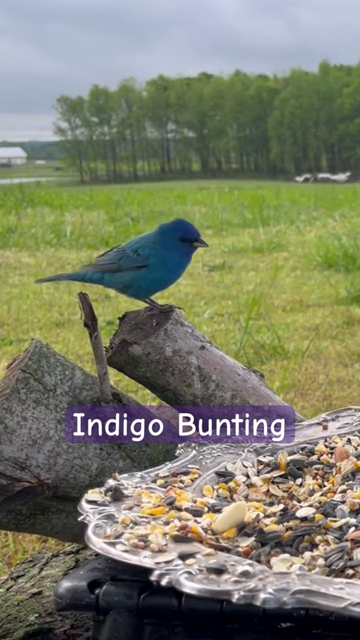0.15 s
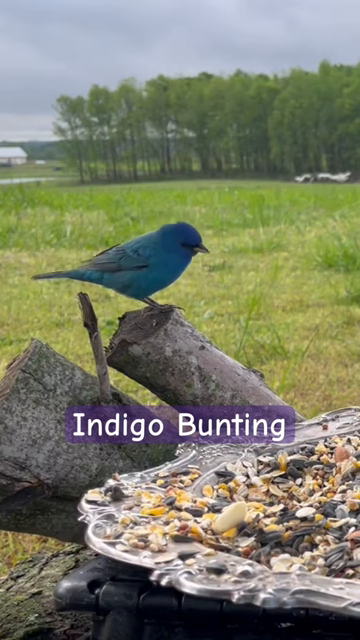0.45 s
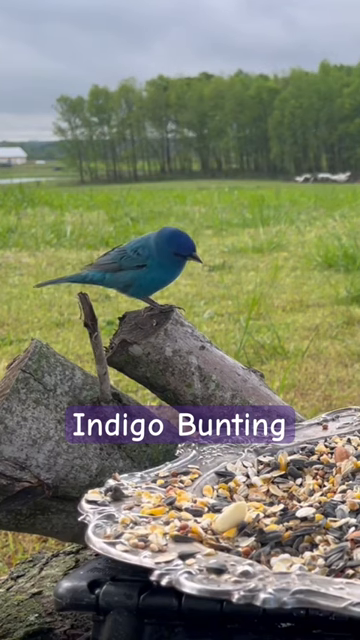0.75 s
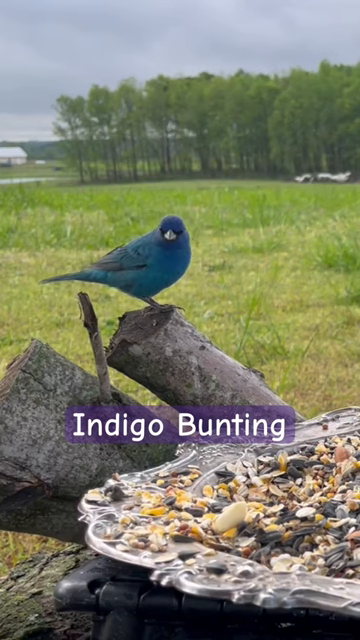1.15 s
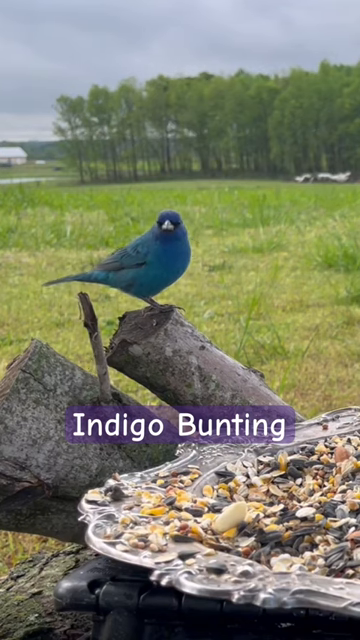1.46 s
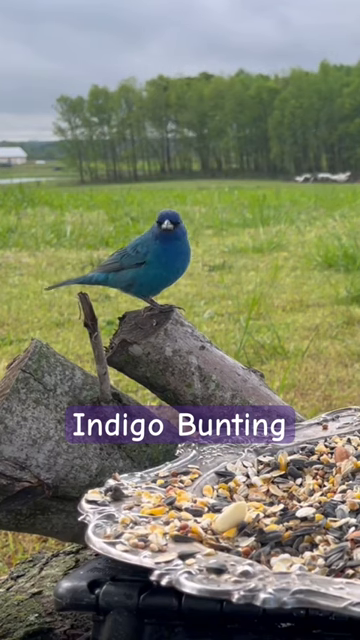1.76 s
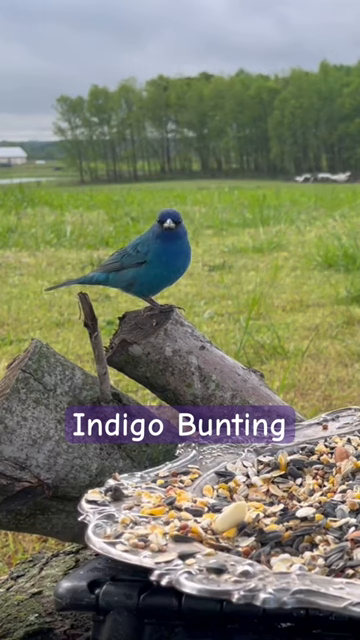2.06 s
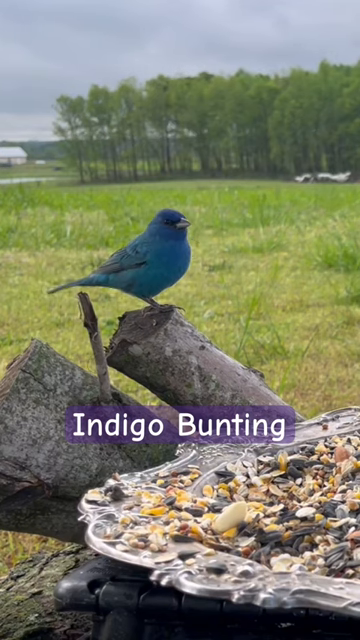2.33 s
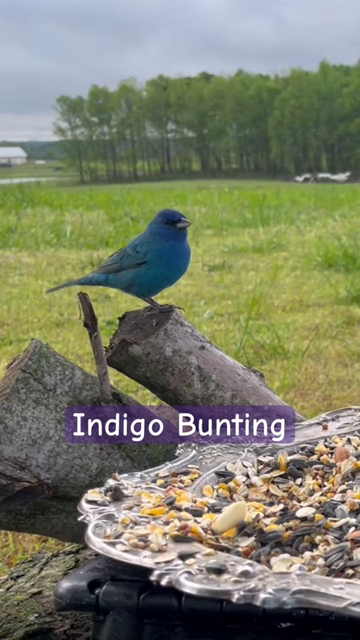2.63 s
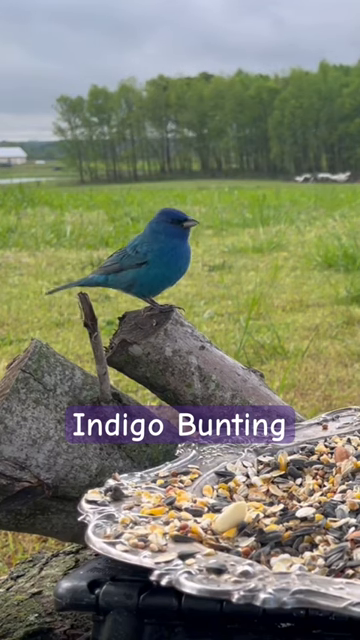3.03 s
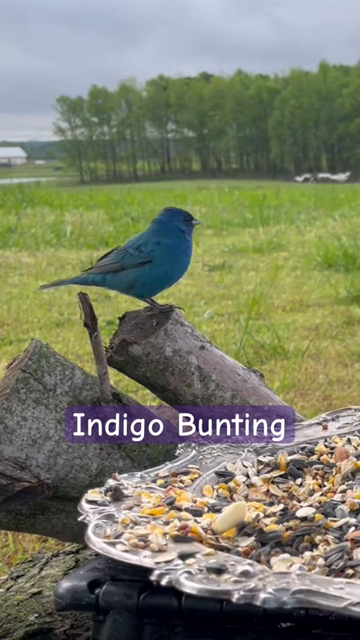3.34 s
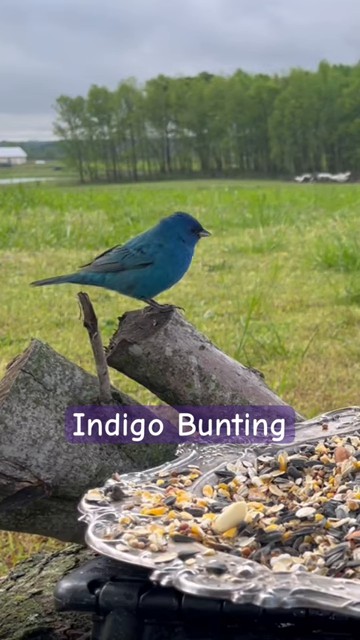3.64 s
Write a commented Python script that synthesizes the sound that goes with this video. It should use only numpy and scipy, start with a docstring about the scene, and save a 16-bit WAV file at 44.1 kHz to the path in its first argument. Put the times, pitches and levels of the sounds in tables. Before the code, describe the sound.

Gusty wind noise dominates, deep and unsteady, with brief bassy buffets. Behind it, distant birds chirp early, nearly fall silent midway, and whistle again near the end as a nearer bird buzzes raspily; outdoors, phone microphone.

```python
"""Wind on a phone's two microphone ports in a breezy garden: shaped noise rumbles, gliding thuds buffet the bass.
Late on, a closer bird to the left buzzes: fast rising pulses of tone with raspy overtones.
Far birds whistle, slur and pipe as gliding sines, and chip as sines roughened by noise; trees echo all birds.
Behind lie a far chorus, one blurred band of noise, and the diffuse air of leaves and far country."""
import sys
import numpy as np
from scipy import signal
from scipy.fft import rfft, irfft
from scipy.io import wavfile
from scipy.ndimage import uniform_filter1d

SR = 44100
rng = np.random.default_rng(int(sys.argv[2]) if len(sys.argv) > 2 else 0)


def put_to_file(sound):
    """Save the sound as 16-bit audio at rate SR, in the file named by the first command-line argument."""
    columns = np.atleast_2d(sound).T  # one column per channel
    safe = np.clip(columns, -1, 1)
    whole_steps = np.round(safe * 32767)
    wavfile.write(sys.argv[1], SR, whole_steps.astype(np.int16))


def magnitude_from_level(level_db):
    """Linear magnitude for a level in decibels (20 dB per decade)."""
    exponent = np.asarray(level_db, float) / 20
    return 10 ** exponent


N = 167139
T = np.arange(N) / SR  # s


def colour(x, points):
    """Shape the spectrum by (f/Hz, gain/dB) points, joined along log frequency."""
    p = np.array(points, float)
    hz = np.maximum(np.arange(N // 2 + 1) * SR / N, 1)
    gain_db = np.interp(np.log(hz), np.log(p[:, 0]), p[:, 1])
    return irfft(rfft(x) * magnitude_from_level(gain_db), N)


def curve(rows, col=1):
    """Straight lines between table rows."""
    return np.interp(T, np.array(rows)[:, 0], np.array(rows)[:, col])


def unit(x):
    """Rms 1."""
    return x / np.sqrt(np.mean(x ** 2))


def walk(rate):
    """Smooth random wander of rms 1: noise averaged twice over 1/rate seconds."""
    k = max(int(SR / rate), 1)
    smooth = uniform_filter1d(rng.standard_normal(N), k)
    return unit(uniform_filter1d(smooth, k))


# Side of the diffuse noise against its mid; above about 10 kHz the side thins steeply: f/Hz, side minus mid
# level/dB
SIDE_SPREAD = [(60, -8), (300, -5), (1300, 3.5), (2300, -6.5), (9000, 4.5), (10800, -14)]


def wide(points):
    """Diffuse noise at both ports, from independent mid and side; the mid has rms 1."""
    mid = colour(rng.standard_normal(N), points)
    side = colour(rng.standard_normal(N), points)
    gain = 1 / np.sqrt(np.mean(mid ** 2))
    side = colour(side, SIDE_SPREAD)
    return gain * np.array([mid + side, mid - side])


def place(x, pan_db, lag_s):
    """A source to the left of the microphones: louder and earlier there."""
    hz = np.arange(N // 2 + 1) * SR / N
    late = irfft(rfft(x) * np.exp(-2j * np.pi * hz * lag_s), N)
    return np.array([x * magnitude_from_level(pan_db / 2), late * magnitude_from_level(-pan_db / 2)])


def gate(start, length, edge):
    """Soft on, hold, soft off."""
    to_nearest_end = np.minimum(T - start, start + length - T)
    return np.clip(to_nearest_end / min(edge, length / 2), 0, 1) ** 2


def notes(rows, waver_db, bend, edge=.0089, swell_db=0):
    """Sines on glides that settle faster for a larger bend, wavering with distance."""
    out, blur, waver = 0, walk(300), walk(29)
    for start, length, from_hz, to_hz, db in rows:
        u = np.clip((T - start) / length, 0, 1)
        hz = to_hz + (from_hz - to_hz) * (1 - u) ** bend + 25 * blur
        tone = np.sin(2 * np.pi * np.cumsum(hz) / SR)
        swell = magnitude_from_level(db + swell_db * np.sin(np.pi * u))
        out = out + swell * gate(start, length, edge) * tone
    return np.sqrt(2) * out * magnitude_from_level(waver_db * waver)


# Wind on the ports, mid level before flutter: t/s, level/dB
WIND_GUSTS = [(0, -42.5), (.12, -40.5), (.3, -51), (.58, -43.5), (.72, -44), (1.03, -51), (1.3, -44),
              (1.52, -43), (1.82, -49), (1.93, -46.5), (2.2, -52), (2.6, -46), (3.1, -50), (3.2, -45),
              (3.5, -54.5), (3.73, -45.5)]
# Wind spectrum, relative: f/Hz, level/dB per Hz
WIND_SPECTRUM = [(20, -19), (45, -4), (70, -0.5), (130, -7.5), (280, -22.5), (500, -32.5), (900, -76)]
FLUTTER_DB, FLUTTER_PER_S = 3, 20.1
# Strong buffets: t/s, peak level/dB before roughening and filtering, length/s
WIND_BUFFETS = [(0.241, -27.5, 0.023), (.36, -38, .03), (1.622, -38.5, 0.014), (3.19, -40, .025),
                (3.594, -20, .05)]
# Each thud starts at the sum of these two pitches and drops towards the ring
BUFFET_RING_HZ, BUFFET_DROP_HZ, BUFFET_GLIDE_S = 58, 280, .0074


def wind():
    """Fluttering rumble; each buffet is a soft rough thud whose pitch drops to a low ring."""
    thuds = 0
    for start, db, length in WIND_BUFFETS:
        t = np.clip(T - start, 0, length)
        drop_cycles = BUFFET_DROP_HZ * BUFFET_GLIDE_S * (1 - np.exp(-t / BUFFET_GLIDE_S))
        phase = 2 * np.pi * (BUFFET_RING_HZ * t + drop_cycles)
        # .68 brings the peak forward, 1.5 softens both ends
        shape = np.abs(np.sin(np.pi * (t / length) ** .68)) ** 1.5
        thuds = thuds + magnitude_from_level(db) * shape * np.sin(phase)
    rough = thuds * (1 + .3 * walk(300))
    thuds = colour(rough, [(350, 0), (480, -30)])
    level_db = curve(WIND_GUSTS) + FLUTTER_DB * walk(FLUTTER_PER_S)
    return wide(WIND_SPECTRUM) * magnitude_from_level(level_db) + thuds


# Closer bird, mid-syllable level before pulsing and pan:
# t/s, length/s, start centre f/Hz, end centre f/Hz, level/dB, overtones' relative level/dB before filtering
BUZZ_SYLLABLES = [(2.964, .052, 4000, 4850, -66.5, -5), (3.012, .036, 4200, 4700, -67.5, 0),
                  (3.075, .048, 4100, 4850, -69.5, -11), (3.186, .05, 4150, 5000, -65.5, 3),
                  (3.3, .078, 4700, 4550, -73, 3)]
WARBLE_HZ, WARBLE_DEPTH_HZ, BUZZ_BLUR_HZ = 150, 700, 340  # mean pulse rate, pitch swing, pitch blur
RASP_DB, RASP_LATE_S = 6, .0099
BUZZ_PAN_DB, OVERTONE_PAN_DB, BUZZ_LAG_S = 10, .92, 6e-5


def buzz():
    """A voice of fast rising pulses with raspy overtones, swelling through each syllable."""
    low, high = 0, 0
    cycle = np.cumsum(WARBLE_HZ * (1 + .15 * walk(100))) / SR % 1
    warble, pulse = 2 * cycle - 1, np.sin(np.pi * cycle)
    blur = walk(500)
    rasp = rng.standard_normal(N) * (.5 + pulse)
    for start, length, from_hz, to_hz, db, over_db in BUZZ_SYLLABLES:
        u = np.clip((T - start) / length, 0, 1)
        hz = from_hz + (to_hz - from_hz) * u + WARBLE_DEPTH_HZ * warble + BUZZ_BLUR_HZ * blur
        phase = 2 * np.pi * np.cumsum(hz) / SR
        env = magnitude_from_level(db - 10 * (0.5 - u)) * gate(start, length, 0.0036)
        low = low + env * np.sin(phase) * 1.5 * pulse
        octave = env * np.sin(2 * phase)
        late_rasp = np.roll(env, int(RASP_LATE_S * SR)) * magnitude_from_level(RASP_DB) * rasp
        high = high + magnitude_from_level(over_db) * (octave + late_rasp)
    high = colour(high, [(4000, -12), (6500, -3), (8000, -7), (10000, 1), (13900, -11), (14800, -33)])
    return place(low, BUZZ_PAN_DB, BUZZ_LAG_S) + place(high, OVERTONE_PAN_DB, BUZZ_LAG_S)


# Clear far whistles, level before waver and pan: t/s, length/s, start f/Hz, end f/Hz, level/dB
CLEAR_WHISTLES = [ (.055, 0.043, 4180, 3850, -69.5), (.083, 0.068, 2650, 2850, -74),
                  (.238, 0.04, 2195, 2150, -71), (.277, 0.028, 2400, 2580, -73),
                  (.138, .035, 4050, 3950, -75), (.615, .05, 3600, 4300, -81),
                  (.452, 0.027, 4000, 4320, -75), (.513, 0.06, 2590, 2760, -76),
                  (.6, 0.03, 2300, 1950, -75), (.035, .03, 4050, 4550, -76), (2.84, 0.044, 2430, 2390, -77),
                  (2.88, 0.04, 2550, 2900, -76.5), (3.025, 0.078, 3315, 3360, -66),
                  (3.095, 0.071, 3200, 2350, -77.5), (3.135, .102, 3352, 3310, -63.5),
                  (3.125, 0.055, 4430, 4030, -77), (3.24, 0.066, 3710, 3820, -73),
                  (3.295, 0.095, 2490, 2343, -73.5), (3.48, .06, 3340, 3300, -73),
                  (3.635, .035, 4270, 4300, -80), (3.706, .04, 4950, 4750, -84),
                  (3.54, 0.082, 3340, 2400, -77), (3.74, 0.044, 2450, 2320, -75)]


def whistles():
    """Far clear notes: sines on nearly straight glides."""
    return notes(CLEAR_WHISTLES, waver_db=.5, bend=1.1)


# One far bird's rising slur, level before waver and pan: t/s, level/dB
RISING_SLURS = [(0.124, -71), (.41, -72), (0.688, -71), (0.963, -77), (1.247, -78.5), (1.547, -78.5)]
SLUR_S, SLUR_FROM_HZ, SLUR_TO_HZ = .066, 1780, 2360


def slurs():
    """One bird repeats a short sine that slides upward."""
    rows = [(start, SLUR_S, SLUR_FROM_HZ, SLUR_TO_HZ, db) for start, db in RISING_SLURS]
    return notes(rows, waver_db=.5, bend=1.1)


# A faint bird's pipes: t/s, length/s
FAINT_PIPES = [(2.32, .07), (2.42, .04), (2.478, .09), (2.586, .034)]
PIPE_HZ, PIPE_DB = 3050, -86.5  # level before waver and pan


def pipes():
    """A faint bird pipes around one pitch."""
    rows = [(start, length, PIPE_HZ, PIPE_HZ, PIPE_DB) for start, length in FAINT_PIPES]
    return notes(rows, waver_db=.5, bend=1.1)


# Far sliding whistles, level before swell, waver and pan: t/s, length/s, start f/Hz, end f/Hz, level/dB
FALLING_SLIDES = [(.18, .19, 4500, 3623, -73.5), (.195, .18, 4490, 3990, -74),
                  (3.47, .165, 4650, 4160, -74), (3.663, 0.15, 4450, 3550, -77.5)]


def slides():
    """Far whistles that drop and then level out, swelling in the middle."""
    return notes(FALLING_SLIDES, waver_db=1.5, bend=4.2, swell_db=5)


# Far rough calls and thin high chips, level before swell, waver and pan:
# t/s, length/s, start f/Hz, end f/Hz, level/dB
ROUGH_CHIPS = [ (.7, .15, 1900, 3750, -83), (1.325, 0.045, 7700, 6170, -89), (1.576, .018, 7900, 5000, -77),
               (1.59, .29, 2500, 4100, -84.5), (1.785, 0.059, 8760, 10450, -87),
               (1.87, .03, 5000, 7200, -89), (1.89, .11, 7200, 7000, -93), (2.936, .022, 7000, 5000, -80)]
CHIP_BLUR_PER_S = 1400


def chips():
    """Gliding sines multiplied by a fast random wander, which blurs them into rough calls."""
    clean = notes(ROUGH_CHIPS, waver_db=1, bend=2.3, edge=.003, swell_db=6)
    return clean * walk(CHIP_BLUR_PER_S)


ECHO_T60_S, ECHO_DB = .3, -11  # decay before the treble loss, level of the whole tail


def trees(x):
    """Scattered echoes from trunks and ground: a decaying noise tail at each port."""
    t = T[:SR // 2]
    tail = rng.standard_normal((2, len(t))) * magnitude_from_level(-60 * t / ECHO_T60_S)
    tail = signal.lfilter([1], [1, -.6], tail)  # leaves swallow the treble
    tail = tail / np.sqrt(np.sum(tail ** 2, axis=1, keepdims=True))
    return signal.fftconvolve(x, tail, axes=1)[:, :N] * magnitude_from_level(ECHO_DB)


# Blurred far chorus: t/s, level/dB
FAR_CHORUS = [(0, -71.5), (.45, -76.5), (1.4, -97), (2.7, -114.5), (3.2, -78.5), (3.79, -78)]
CHORUS_HZ, CHORUS_WANDER_PER_S = 3800, 1820  # centre; a faster wander widens the band


def chorus():
    """Many far voices merged into a band: random wanders carried on one centre pitch."""
    phase = 2 * np.pi * CHORUS_HZ * T
    band = []
    for _ in range(2):
        in_phase = walk(CHORUS_WANDER_PER_S) * np.cos(phase)
        band.append(in_phase + walk(CHORUS_WANDER_PER_S) * np.sin(phase))
    return np.array(band) * magnitude_from_level(curve(FAR_CHORUS))


# Leaves and far country, mid level before a slight waver: t/s, level/dB
AIR_LEVELS = [(0, -67.5), (2.6, -72), (3.79, -71)]
# Air spectrum, relative: f/Hz, level/dB per Hz
AIR_SPECTRUM = [(200, -41), (350, -3), (650, -8.5), (1600, -18), (2350, -18.5), (7300, -39.5),
                (8300, -80.5), (9600, -43.5), (12900, -45), (13500, -73)]


def air():
    """Diffuse shaped noise whose level wavers slightly."""
    return wide(AIR_SPECTRUM) * magnitude_from_level(curve(AIR_LEVELS) + 0.7 * walk(17))


FAR_PAN_DB, FAR_LAG_S = 3.5, 3e-5
BUZZ_ECHO_DB = 4  # extra drive of the closer bird into the trees


def scene():
    """Wind over the closer bird, the far birds, their echoes, chorus and air."""
    near = buzz()
    far = whistles() + slurs() + pipes() + slides() + chips()
    far = place(far, FAR_PAN_DB, FAR_LAG_S)
    echoes = trees(far + near * magnitude_from_level(BUZZ_ECHO_DB))
    return wind() + near + far + echoes + chorus() + air()


def top_cut(x):
    """Nothing passes above the cut-off."""
    return signal.sosfilt(signal.butter(12, 14980, fs=SR, output="sos"), x)


def record(dry):
    """The finished mix from the two microphone ports, as stored."""
    return top_cut(dry)


dry = scene()
out = record(dry)
put_to_file(out)
```